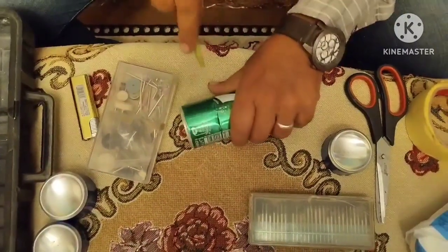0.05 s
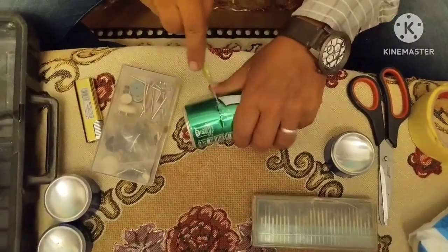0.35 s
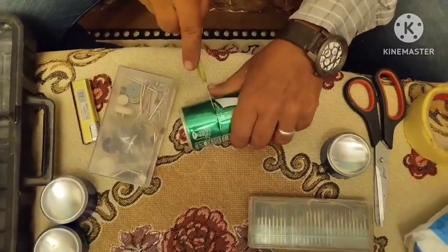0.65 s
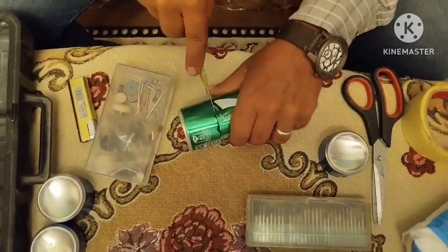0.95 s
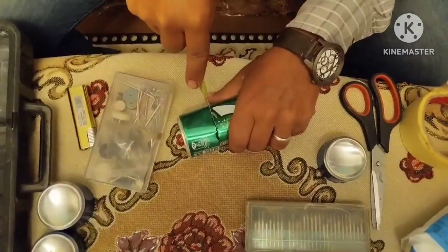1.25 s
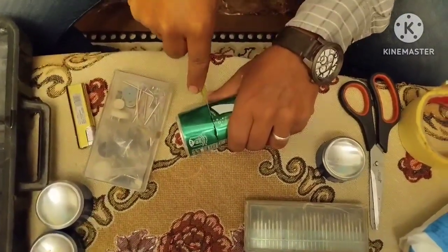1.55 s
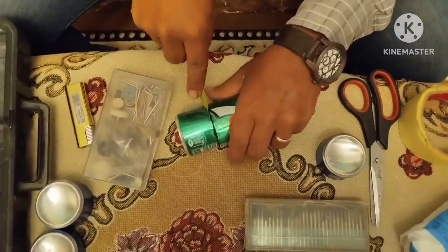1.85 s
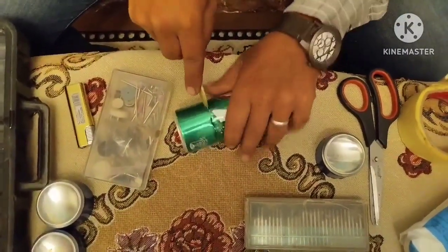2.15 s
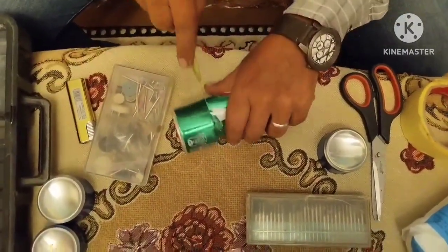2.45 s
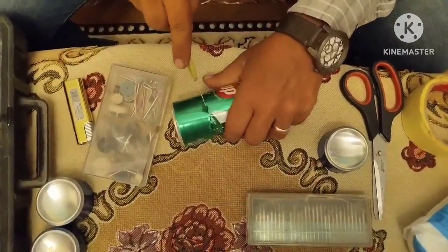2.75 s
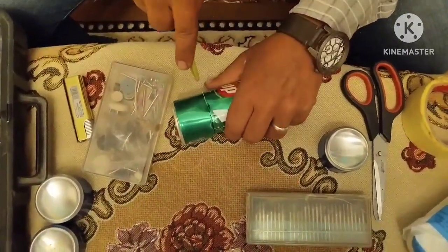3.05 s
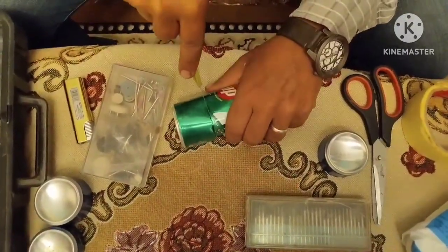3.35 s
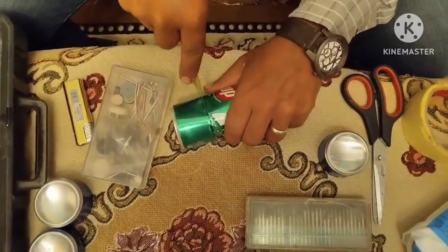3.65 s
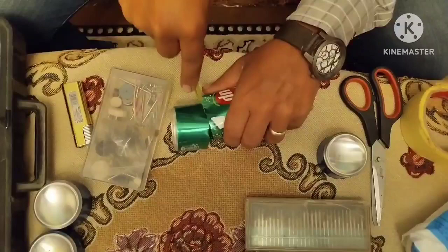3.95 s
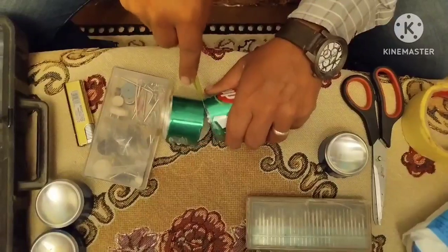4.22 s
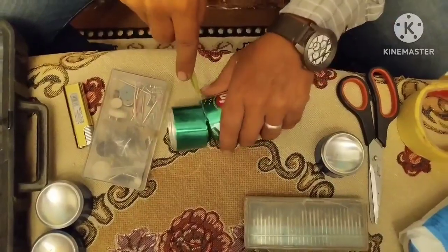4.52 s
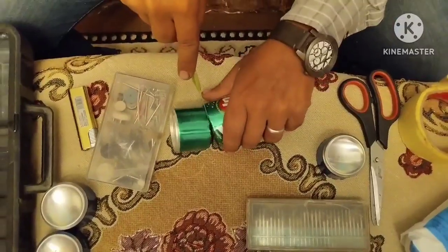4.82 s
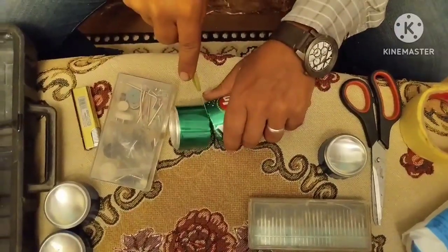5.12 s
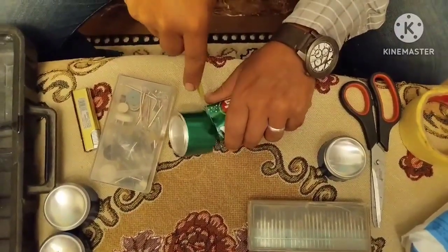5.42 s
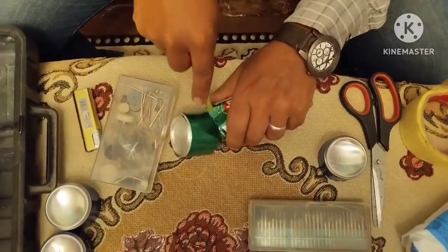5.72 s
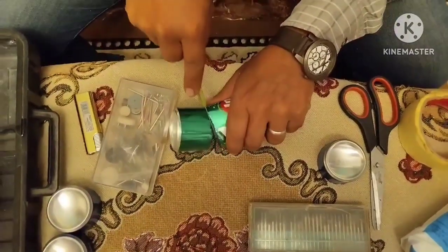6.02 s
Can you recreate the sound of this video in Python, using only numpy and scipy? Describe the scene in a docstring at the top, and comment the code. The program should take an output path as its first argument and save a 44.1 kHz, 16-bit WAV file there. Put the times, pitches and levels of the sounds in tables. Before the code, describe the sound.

A blade cuts around an empty aluminium can, the thin wall snapping and crackling with short hollow notes, close in a quiet room.

```python
"""Close mono microphone in a small quiet room: a craft knife cuts round an empty aluminium can on a
cloth-covered table. The blade scrapes in and the thin wall buckles in sharp snaps, hardest at 0.3 s,
each with a short hollow note from the air inside. Light ticks lead to a busy run from 1.7 to 3 s, where
the cut edge pings and the blade squeaks. Softer cutting follows; from 4.5 s the can bumps on the cloth
now and then, and a cluster of hollow snaps ends the cut near 6 s. Room tone lies under it all."""
import sys
import numpy as np
from scipy import signal
from scipy.fft import rfft, irfft
from scipy.io import wavfile
from scipy.ndimage import uniform_filter1d

SR = 44100
rng = np.random.default_rng(int(sys.argv[2]) if len(sys.argv) > 2 else 0)


def wav_out(sig):
    """Save sig, one row per channel (or a flat mono array), as 16-bit PCM at SR to the path in sys.argv[1]."""
    wavfile.write(sys.argv[1], SR, np.round(np.clip(np.atleast_2d(sig).T, -1, 1) * 32767).astype(np.int16))


N = 272393
TIME = np.arange(N) / SR
SIZE = 2048  # samples in one snap or filter
HZ = np.fft.rfftfreq(SIZE, 1 / SR)

# the wall buckles: (time [s], length [s], hollow level [dB], clatter level [dB],
# brightness [dB/octave], patch pitch [Hz]); event levels in all tables are relative
SNAPS = [(0.0648, 0.0027, -35.5, -48.5, -7.5, 2000), (0.192, 0.0047, -33, -33, -1.5, 2760),
         (0.2373, 0.011, -29.5, -26, -0.5, 3700), (0.3, 0.0056, -21, -22.5, 0, 5000),
         (0.3237, 0.0091, -11, -13, 1, 13800), (0.4812, 0.0033, -43, -43, -1, 1460),
         (0.5983, 0.008, -36, -30.5, -0.5, 7900), (0.641, 0.0056, -50, -58, -3, 1600),
         (0.6523, 0.0057, -41, -32.0, 2.5, 2980), (0.7137, 0.004, -69.5, -42, 5.5, 6110),
         (0.724, 0.0025, -67, -41.5, 2.5, 6460), (0.7711, 0.0062, -44.0, -42.5, 2.5, 5500),
         (0.8994, 0.0058, -43.5, -30.5, 6.0, 5460), (1.0006, 0.0037, -56.5, -45.5, 0.0, 9980),
         (1.175, 0.016, -50, -59, -1.5, 5390), (1.2537, 0.0051, -28, -43.5, -4.5, 4520),
         (1.375, 0.0037, -59, -64, -3, 4650), (1.396, 0.0033, -51, -65.5, -4.5, 2850),
         (1.5406, 0.0072, -35.5, -57.5, 3, 5880), (1.6823, 0.0052, -48, -63.5, 2, 1790),
         (1.7059, 0.0037, -25, -22, 4.0, 4150), (1.808, 0.0047, -36, -59, 1, 2200),
         (1.8333, 0.015, -33.5, -54, 1, 4510), (1.9114, 0.0063, -42, -37, 1.5, 2700),
         (2.0193, 0.019, -30.5, -41, 3, 4600), (2.0338, 0.0078, -17.0, -27, -2, 12300),
         (2.0647, 0.0077, -33.5, -41.5, -2.0, 2500), (2.183, 0.007, -35, -31.5, 5.0, 2660),
         (2.2517, 0.0083, -53.5, -37, 3.5, 3170), (2.3342, 0.0064, -46, -34, 1.5, 3120),
         (2.3433, 0.0083, -44.5, -41.5, -1, 2040), (2.4089, 0.011, -30.0, -28, 2.5, 4600),
         (2.4207, 0.0044, -29.5, -26, 3, 1620), (2.4363, 0.0087, -36.5, -40, -3.5, 1690),
         (2.514, 0.0087, -20.5, -28.5, 0.5, 6200), (2.5385, 0.0082, -19.5, -27.5, -0.5, 2080),
         (2.6276, 0.01, -44, -52, -10, 3880), (2.6565, 0.0081, -22.5, -31.5, -1.5, 3450),
         (2.8033, 0.012, -24.5, -27.5, -3.5, 3765), (2.8112, 0.0086, -19.5, -26, 2, 3840),
         (2.8205, 0.0025, -23.5, -30, -1.5, 8600), (2.9084, 0.0061, -25, -19.5, 1.5, 3110),
         (2.9207, 0.021, -24.5, -34, -2, 6590), (3.0194, 0.0092, -33, -39.5, 3.5, 3360),
         (3.054, 0.01, -48, -55, -1, 5970), (3.087, 0.0046, -69, -62.5, 3, 5630),
         (3.374, 0.0056, -51.5, -69.5, -6, 2090), (3.432, 0.0032, -48.5, -34, 1.5, 5060),
         (3.484, 0.0044, -47, -32, 3.0, 4020), (3.616, 0.012, -33.0, -47.0, -3.5, 2380),
         (3.669, 0.0037, -28.0, -36.5, -3.5, 8170), (3.7997, 0.0062, -36.5, -69.5, -10, 12810),
         (4.0581, 0.003, -44.5, -65, -13, 2040), (4.1547, 0.0024, -42.5, -43, -3.5, 5470),
         (4.178, 0.012, -43.0, -54.5, -1, 12100), (4.217, 0.0095, -42, -63.5, -10, 9430),
         (4.2863, 0.003, -47, -47, 5.5, 1400), (4.3139, 0.0078, -33, -49.5, -2, 2060),
         (4.3712, 0.0056, -46.5, -38, 2.5, 12520), (4.411, 0.005, -37.0, -52, 0, 4160),
         (4.459, 0.0076, -36.5, -43.5, -0.5, 3550), (4.4737, 0.009, -42.0, -45.5, -4.5, 3090),
         (4.6068, 0.011, -27.5, -32, -1.5, 3930), (4.617, 0.011, -39, -29, 10.5, 4730),
         (4.782, 0.025, -67, -56, 1.5, 3870), (4.8573, 0.019, -49.0, -53, 2, 2467),
         (5.1137, 0.011, -40.0, -39.0, 4, 6550), (5.137, 0.018, -51, -52.5, -2, 10400),
         (5.202, 0.011, -47.5, -47.5, 2.5, 5880), (5.2544, 0.012, -42.5, -53.5, 1, 4350),
         (5.83, 0.007, -31, -53.5, -2.5, 1408), (5.8624, 0.0034, -32, -55, -2, 1646),
         (5.8678, 0.0086, -32, -40, -1.5, 12300), (5.8806, 0.0043, -37, -49, 0, 1600),
         (5.918, 0.0057, -36, -59.5, -4.5, 1630), (5.9471, 0.0089, -27.5, -38.5, -0.5, 2120),
         (5.9544, 0.012, -32, -39, -2.5, 1630), (5.9972, 0.008, -30.5, -42, -2.5, 3880),
         (6.023, 0.006, -20, -41.5, -6.5, 1500), (6.047, 0.011, -40, -54, 1, 1610),
         (6.0583, 0.011, -29, -50, -2.5, 1448)]
# pushes of the blade: (time [s], length [s], hollow level [dB], hiss level [dB], swell [dB])
STROKES = [(0.0, 0.098, -31, -22.5, -44.5), (0.247, 0.08, -32, -29, -16.5),
           (0.346, 0.092, -30.5, -32.5, -23.5), (0.62, .14, -75, -65.5, 14.5),
           (1.359, 0.24, -61, -70.5, 5.5), (1.715, 0.12, -28, -36, -19.5), (1.846, .11, -44, -55.5, -1.5),
           (1.956, 0.074, -34, -46.5, 3), (2.425, 0.025, -50, -21.5, -18), (2.556, 0.023, -30.5, -28, -10),
           (2.667, 0.11, -31.5, -28.5, -20), (2.82, 0.032, -30, -30.5, -11), (2.934, .04, -27.5, -35, -23),
           (3.021, 0.057, -43, -62, -14), (3.624, 0.042, -38, -46, -15.5), (3.815, 0.037, -49, -62.5, 15),
           (3.846, 0.061, -32.5, -46.5, 0), (4.179, 0.058, -50.5, -59, 1.5), (4.256, .055, -55, -62.5, 8.5),
           (4.376, 0.23, -63.5, -63.5, 5), (4.634, 0.013, -32.5, -38, -5.5),
           (5.125, 0.17, -61.5, -59, -2.5), (5.359, 0.1, -77, -70, 4.5), (5.83, 0.16, -46, -59, -11.5),
           (5.98, 0.1, -34, -50, -9)]
# the blade chatters evenly: (time [s], pitch [Hz], level [dB])
SQUEAK = [(2.666, 850, -34), (2.688, 809, -41), (2.708, 873, -34), (2.734, 846, -35.5), (2.761, 845, -44),
          (2.777, 880, -36), (2.788, 820, -59.5)]
# the cut edge flicks off the blade: (time [s], pitch [Hz], level [dB], t60 [s])
EDGE_PINGS = [(2.254, 3190, -19, 0.017)]
# the can bumps on the cloth: (time [s], pitch [Hz], level [dB], t60 [s])
CLOTH_BUMPS = [(4.475, 383, -30, 0.046), (5.445, 395, -47.5, 0.027), (5.564, 814, -45.5, 0.035),
               (5.742, 860, -54.5, 0.025)]
# bright clatter of the wall: (frequency [Hz], level [dB])
WALL_SPECTRUM = [(710, -18.5), (1200, -15.5), (2010, -5), (2480, -13.5), (2800, -10.5), (3940, -11),
                 (4670, -8.5), (5150, -10), (5610, -8.5), (6510, -10.5), (8790, 1.5), (10200, -10),
                 (12200, -8), (13300, -18), (15500, -16.5)]
# the wall's stronger modes: (frequency [Hz], width [Hz], lift [dB])
WALL_MODES = [(1160, 350, 8.5), (1583, 70, 3.5), (1804, 21, 3), (3400, 170, -2), (4272, 250, 1.5),
              (5600, 280, 3.5), (5780, 74, -1), (7720, 62, 4.5), (8850, 230, 2.5), (9750, 40, -1),
              (10600, 200, 6), (11500, 200, 2)]
# bands of the clatter: (low edge [Hz], high edge [Hz])
WALL_BANDS = [(1200, 2500), (2500, 7000), (7000, 11000), (11000, 16000)]
# an ordinary snap in each of those bands: (level [dB])
WALL_SHARES_DB = [-6, -4, -0.52, -9]
# ringing of a buckling patch of wall: (mean pitch [Hz], scatter [Hz])
PATCH_PITCHES = [(1650, 250), (4900, 500), (8550, 450)]
# tilt of the wall's sound when scraped: (frequency [Hz], gain [dB])
SCRAPE_TILT = [(1500, 3.5), (3300, 1.0), (4900, 0), (6500, -2.5), (8800, -3.5), (15000, -5.5)]
# what drives the hollow note: (frequency [Hz], level [dB])
HOLLOW_DRIVE = [(40, -25), (120, -14.5), (185, -13.5), (270, -19.5), (385, -12), (470, -10), (580, -7.5),
                (720, -0.5), (1000, -3), (1250, -3), (1600, -7), (2600, -25), (6000, -58.5)]
# the hollow note shifts as the grip changes and the cut opens: (time [s], pitch [Hz])
HOLLOW_PITCH = [(0, 694), (.33, 820), (.6, 656), (1.2, 785), (1.75, 742), (2.04, 838), (2.3, 786),
                (2.55, 882), (2.82, 875), (3.0, 790), (3.9, 795), (4.25, 873), (6.1, 859)]
# decay of the room: (frequency [Hz], t60 [s])
ROOM_DECAY = [(150, 0.65), (380, 0.29), (800, 0.33), (2000, 0.36), (5000, 0.3), (9000, 0.27), (15000, 0.35)]
# colour of the reflections: (frequency [Hz], gain [dB])
ROOM_COLOUR = [(200, 7), (290, -0.5), (380, 6), (450, 2.5), (535, 10), (640, 6.5), (900, -3), (1250, 1),
               (1600, 2.5), (3000, 1.5), (5000, -0.5), (8500, 1.5), (15000, -3.5)]
# steady noise of the room: (frequency [Hz], relative level [dB])
ROOM_NOISE = [(20, 4.5), (50, -8.5), (75, -6.5), (125, -10), (230, -11), (290, -20.5), (450, -19.5),
              (520, -16), (620, -21), (830, -19), (1100, -23), (6400, -37), (8400, -27.5), (15500, -42.5)]


def snap(length, note_hz, note_db, clatter_db, brightness, patch_hz, ring):
    """The wall flips in a few milliseconds: a crack, a burst of tiny slips, a push on the air inside."""
    t = np.arange(SIZE) / SR
    level_span = SR * .01  # levels count as rms over 10 ms
    age = t / length
    onset = 1 - np.exp(-t / (.0001 + .09 * length))  # slow buckles start softly
    crack = .6 * np.exp(-t / .0012)
    slips = rng.standard_normal(SIZE) * onset * (np.exp(-age ** 1.45) + crack)
    # each patch rings briefly with pitches of its own, damped by the hand
    tones = sum(np.sin(2 * np.pi * ((hz + scatter * rng.standard_normal()) * t + rng.random()))
                for hz, scatter in PATCH_PITCHES)
    damping = np.exp(-np.maximum(age, t / .0049) ** 1.45)
    clatter = colour(slips + ring * tones * onset * damping, wall_db())
    # brightness tilts the bands about 6 kHz
    power = abs(rfft(clatter)) ** 2 * 2 / SIZE / level_span
    centres = np.sqrt(np.prod(WALL_BANDS, axis=1))
    bands_db = clatter_db + np.array(WALL_SHARES_DB) + brightness * np.log2(centres / 6000)
    trim = [(hz, db - 10 * np.log10(power[(HZ > lo) & (HZ < hi)].sum()))
            for hz, (lo, hi), db in zip(centres, WALL_BANDS, bands_db)]
    patch_db = 7 * np.exp(-.5 * (np.log2((HZ + 1) / patch_hz) / .2) ** 2)  # loudest round its own pitch
    clatter = colour(clatter, curve(trim, HZ) + patch_db)
    push = np.sin(2 * np.pi * note_hz * t) * np.exp(-age / 0.3)
    note = colour(0.36 * unit_rms(slips) + 0.084 * unit_rms(push), hollow_db(note_hz))
    # the snap also jolts the whole can, round 410 Hz
    thud = colour(slips, -20 * np.log10(1 + (np.log2((HZ + 1) / 410) / 0.62) ** 2))
    body = amp(note_db - 0.87) * unit_rms(note) + amp(clatter_db - 24.5) * unit_rms(thud)
    return amp(-0.01) * clatter + body * np.sqrt(level_span / SIZE)


def snaps(ring):
    """Every buckle and tear, heard from one side; ring is the strength of the patch pitches."""
    out = np.zeros(N)
    for s, length, *voicing in SNAPS:
        add(out, s, snap(length, hollow_hz(s), *voicing, ring))
    return out


def scrape(slips_per_s=3000, spread_db=2.5, ticks_per_s=90, tick_db=18, rasp_hz=4750):
    """The blade sticks and slips in dense uneven grains that sound the wall and the hollow."""
    hollow_gain, hiss_gain = blade_pressure()
    grains = (rng.random(N) < slips_per_s / SR) * rng.choice([-1, 1], N)
    grains = grains * amp(spread_db * np.minimum(rng.exponential(1, N), 4))
    # burrs on the cut edge catch and tick
    burrs = (rng.random(N) < ticks_per_s / SR) * rng.uniform(-1, 1, N) * amp(tick_db)
    # light rubbing moves little air
    rubbing_db = -10 * np.log10((1 + (560 / (HZ + 100)) ** 4) * (1 + (HZ / 2200) ** 2))
    note = resonate(colour(grains, curve(HOLLOW_DRIVE, HZ) + rubbing_db), hollow_hz(TIME))
    # steady rubbing gives the modes time to build up
    singing_db = 0.31 * modes_db() + peak(HZ, rasp_hz, width_hz=400, db=4)
    hiss = colour(grains + burrs, wall_db() + curve(SCRAPE_TILT, HZ) + singing_db)
    return amp(-1) * (unit_rms(note) * hollow_gain + unit_rms(hiss) * hiss_gain)


def blade_pressure(bite_s=0.015, release_s=0.0048, strain_s=0.0046):
    """Gains of the scrape's hollow note and hiss: each push bites, swells or eases, and comes to rest."""
    hollow, hiss = np.zeros((2, N))
    t = np.arange(SR // 2) / SR
    for s, length, note_db, hiss_db, swell_db in STROKES:
        bite = np.minimum(t / bite_s, 1)
        rest = np.exp(-np.maximum(t - length, 0) / release_s)
        shape = bite * amp(swell_db * np.minimum(t / length, 1)) * rest
        add(hollow, s, amp(note_db) * shape)
        add(hiss, s, amp(hiss_db) * shape)
    strain = np.exp(-t[:SIZE] / strain_s)[::-1]  # the wall creaks just before it gives way
    for s, _, note_db, clatter_db, *_ in SNAPS:
        add(hollow, s - SIZE / SR, amp(note_db - 19.5) * strain)
        add(hiss, s - SIZE / SR, amp(clatter_db - 22) * strain)
    return hollow, hiss


def crinkle(ring, per_s=18, spread_db=3, buckle_s=0.0091):
    """Tiny buckles at random moments of the longer pushes, following the strength of the push."""
    out = np.zeros(N)
    for s, length, note_db, hiss_db, swell_db in STROKES:
        for when, note_draw, wall_draw, tilt, patch in rng.random((12, 5))[:int(length * per_s)]:
            body_db = note_db + swell_db * when - 4 + spread_db * (2 * note_draw - 1)
            clatter_db = hiss_db + swell_db * when - 1 + spread_db * (2 * wall_draw - 1)
            buckle = snap(buckle_s, hollow_hz(s), body_db, clatter_db,
                          brightness=2.5 * (2 * tilt - 1), patch_hz=3000 + 3000 * patch, ring=ring)
            add(out, s + when * length, buckle)
    return out


def squeak(jitter=0.0144, flutter=0.37, octave_db=-21):
    """Stick and slip lock onto the hollow note: a wavering tone with a weak octave."""
    s, hz, db = np.transpose(SQUEAK)
    drift, grip = uniform_filter1d(uniform_filter1d(rng.standard_normal((2, N)), size=250), size=150)
    pitch = np.interp(TIME, s, hz) * (1 + jitter * unit_rms(drift))
    phase = 2 * np.pi * np.cumsum(pitch) / SR
    gain = uniform_filter1d(np.interp(TIME, s, amp(db), left=0, right=0), size=200)
    gain *= 1 + flutter * np.tanh(unit_rms(grip))
    return gain * unit_rms(np.sin(phase) + amp(octave_db) * np.sin(2 * phase))


def wall_db(cut_hz=900, dip_hz=2550):
    """The thin wall radiates a broad clatter with a few stronger modes and no bass."""
    dip = peak(HZ, dip_hz, width_hz=500, db=4)
    bass_loss = 10 * np.log10(1 + (cut_hz / (HZ + 30)) ** 6)
    return curve(WALL_SPECTRUM, HZ) + modes_db() - dip - bass_loss


def modes_db():
    """The lift that the stronger modes give to the wall."""
    return sum(peak(HZ, *mode) for mode in WALL_MODES)


def hollow_db(hz, width_hz=170):
    """One broad resonance of the can's air and shell."""
    return curve(HOLLOW_DRIVE, HZ) - 10 * np.log10(1 + (2 * (HZ - hz) / width_hz) ** 2)


def hollow_hz(s):
    """Pitch of the can's hollow at time s."""
    return np.interp(s, *np.transpose(HOLLOW_PITCH))


def resonate(x, hz, width_hz=170):
    """The hollow rings along the moving pitch hz."""
    turn = np.exp(2j * np.pi * np.cumsum(hz) / SR)
    pole = np.exp(-np.pi * width_hz / SR)
    return 2 * (turn * signal.lfilter([1 - pole], [1, -pole], x / turn)).real


def knocks(rows, rise_s=0.0004):
    """Each bump or flick rings one damped mode."""
    out, t = np.zeros(N), np.arange(SR // 4) / SR
    for s, hz, db, t60 in rows:
        add(out, s, amp(db - 60 * t / t60) * np.sin(2 * np.pi * hz * t) * (1 - np.exp(-t / rise_s)))
    return out


def tabletop(x, hz=382, width_hz=45):
    """The table under the can takes up each blow and hums briefly on one low mode."""
    return amp(-1) * signal.lfilter(*signal.iirpeak(hz, hz / width_hz, fs=SR), x)


def room(x, gap_s=0.0013, build_s=0.0022):
    """Dense reflections reach the microphone after a short gap and die band by band."""
    t = np.arange(SR * 3 // 4) / SR
    taps = rng.standard_normal(len(t)) * (1 - np.exp(-np.maximum(t - gap_s, 0) / build_s))
    hz, age, spectra = signal.stft(taps, SR, nperseg=256)
    decay = amp(-60 * age / curve(ROOM_DECAY, hz)[:, None])
    tail = signal.istft(spectra * decay, SR, nperseg=256)[1]
    response = colour(tail / np.linalg.norm(tail), curve(ROOM_COLOUR, HZ))
    return amp(-18) * signal.fftconvolve(x, response)[:N]


def room_tone(noise_db=-59.5, hum_hz=100, hum_db=-70):
    """The quiet room: steady noise with two narrow bands of hiss and a faint mains hum."""
    hz = np.fft.rfftfreq(N, 1 / SR)
    hiss_db = peak(hz, 8400, width_hz=1000, db=4) + peak(hz, 11800, width_hz=700, db=3)
    noise = irfft(rfft(rng.standard_normal(N)) * amp(curve(ROOM_NOISE, hz) + hiss_db), N)
    return amp(noise_db) * unit_rms(noise) + amp(hum_db) * np.sin(2 * np.pi * hum_hz * TIME)


def amp(db):
    """Decibels to gain."""
    return 10 ** (np.asarray(db) / 20)


def unit_rms(x):
    """Scales to rms 1."""
    return x / np.sqrt(np.mean(x ** 2) + 1e-20)


def curve(points, hz):
    """Reads a table along a log-frequency axis."""
    f, value = np.transpose(points)
    return np.interp(np.log(hz + 1), np.log(f + 1), value)


def peak(hz, centre_hz, width_hz, db):
    """A bell-shaped lift in decibels."""
    return db / (1 + (2 * (hz - centre_hz) / width_hz) ** 2)


def add(mix, s, sound):
    """Mixes a sound in at time s."""
    part = mix[max(round(s * SR), 0):][:len(sound)]
    part += sound[:len(part)]


def colour(x, db):
    """Causal filter with the given gain on the HZ grid."""
    log_gain = np.log(amp(np.r_[db, db[-2:0:-1]]))
    taps = np.fft.ifft(np.exp(signal.hilbert(log_gain).conj())).real
    return signal.fftconvolve(x, taps)[:len(x)]


def scene():
    """The can close to the microphone, the table under it, the small room behind."""
    bumps = 0.89 * knocks(CLOTH_BUMPS)
    cutting = scrape() + crinkle(ring=.5) + squeak()
    direct = snaps(ring=0.48) + cutting
    # the crumpled wall sends a different clatter to the far side of the room, which smooths the tail
    sideways = snaps(ring=.1) + cutting
    reflected = 0.6 * room(direct + 4.7 * bumps) + 1.2 * room(sideways + tabletop(sideways))
    return (direct + bumps + knocks(EDGE_PINGS) + tabletop(direct) + reflected + room_tone())[None]


def record(dry):
    """The recorder overloads on the hardest snap, then cuts the treble above 15.75 kHz."""
    clipped = np.clip(dry, -.88, .88)
    lowpass = signal.firwin(511, 15750, window=("kaiser", 8), fs=SR)
    return signal.oaconvolve(clipped, lowpass[None], "same", axes=1)


dry = scene()
out = record(dry)
wav_out(out)
```